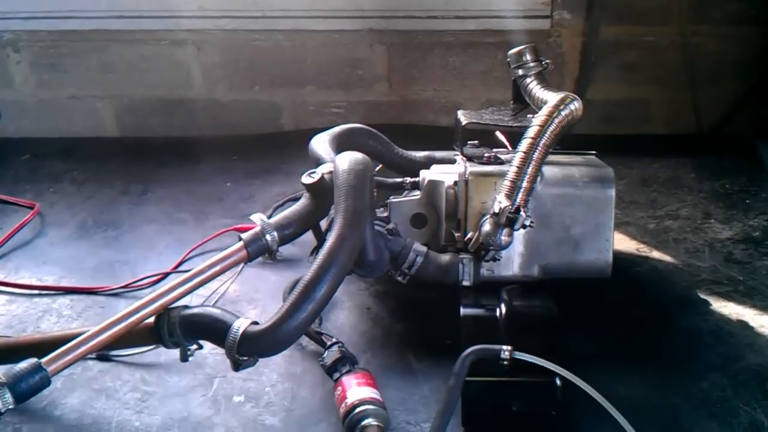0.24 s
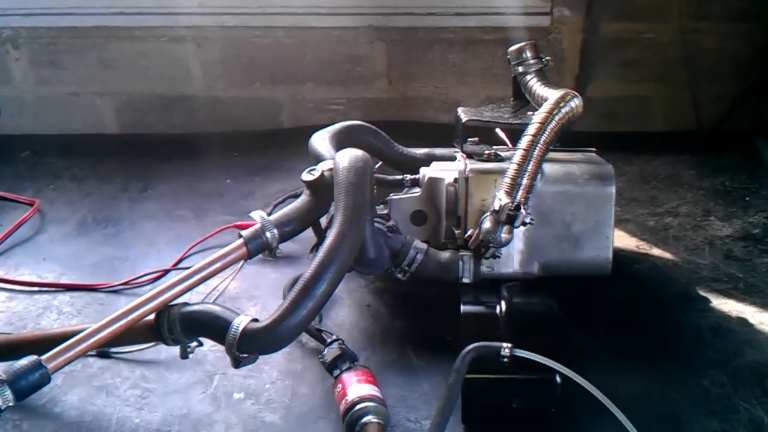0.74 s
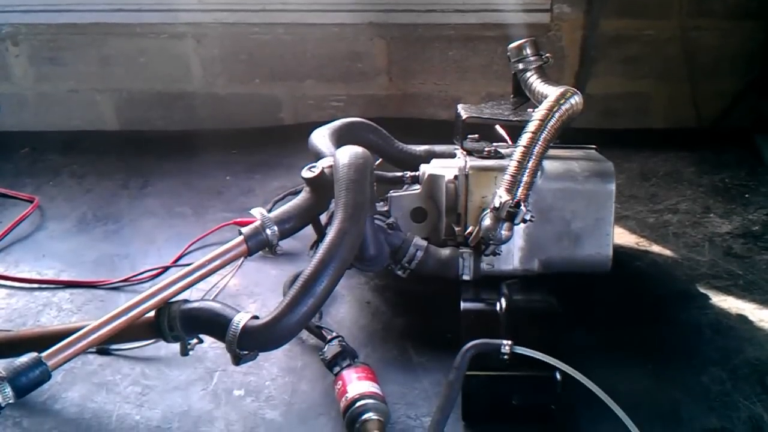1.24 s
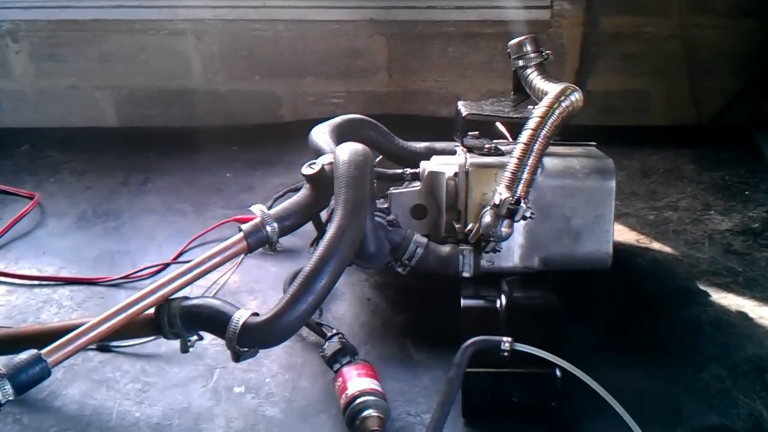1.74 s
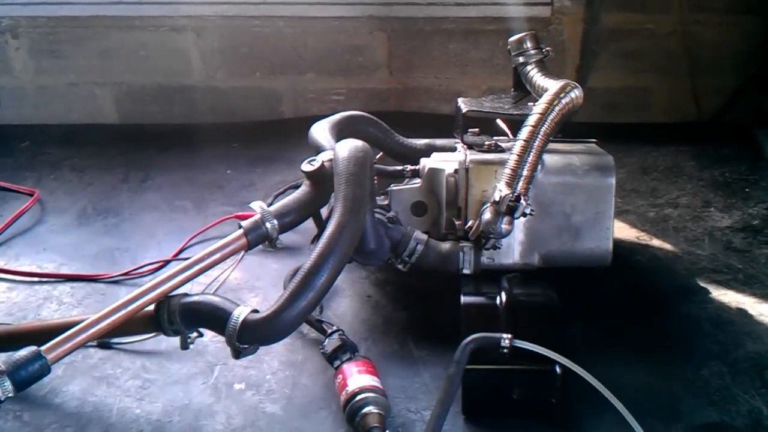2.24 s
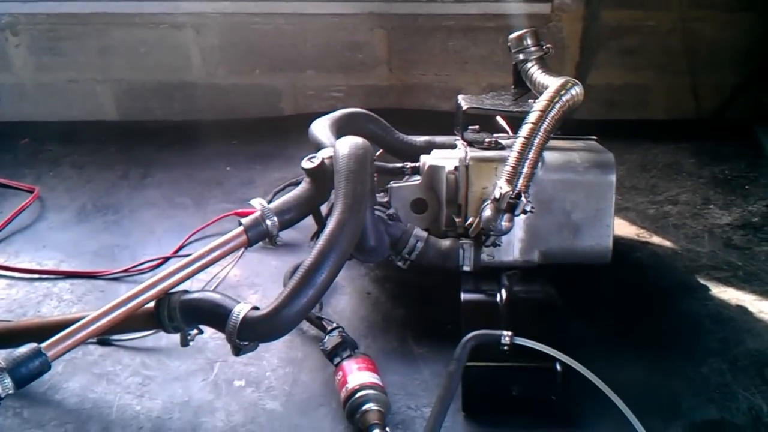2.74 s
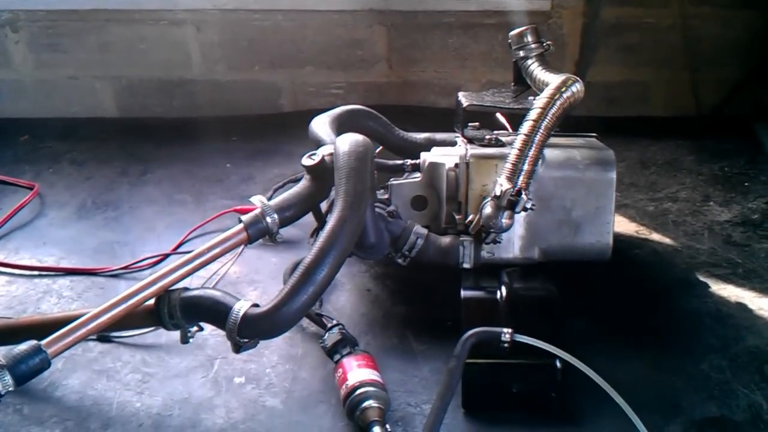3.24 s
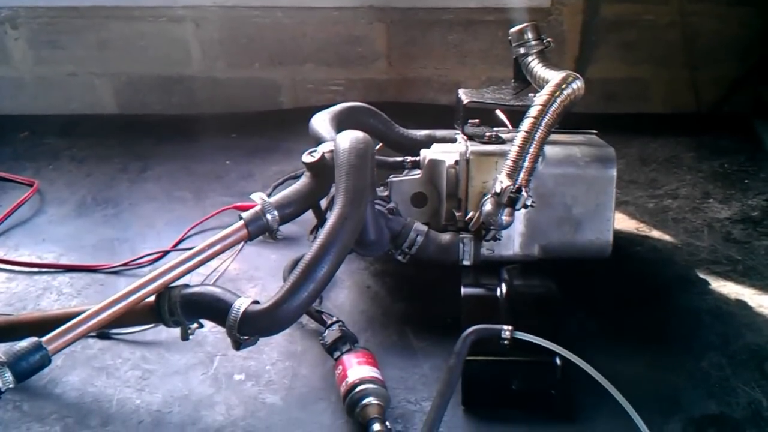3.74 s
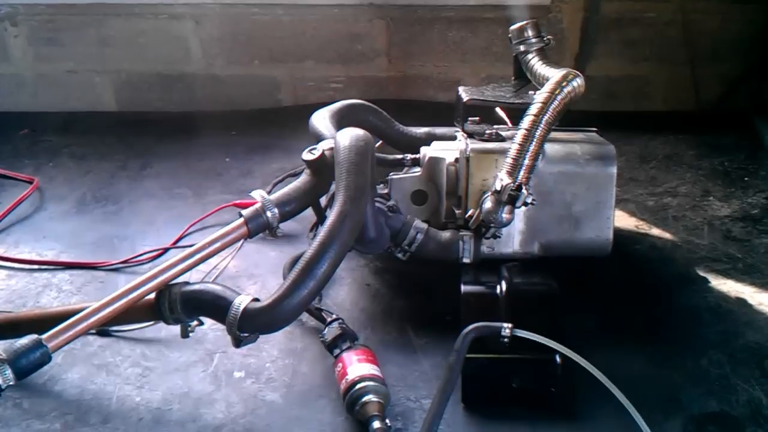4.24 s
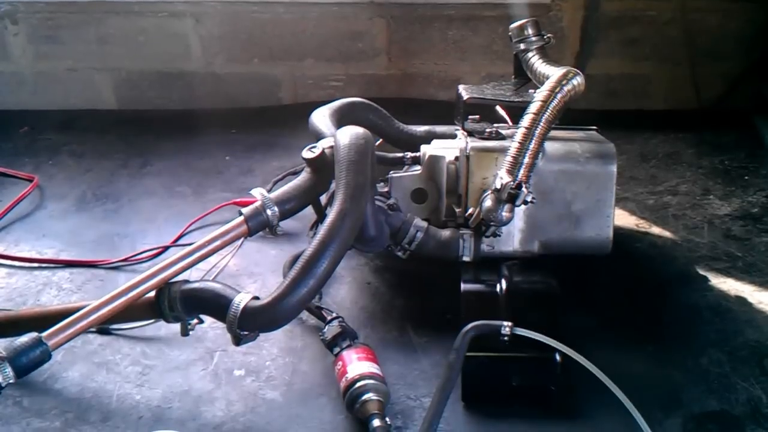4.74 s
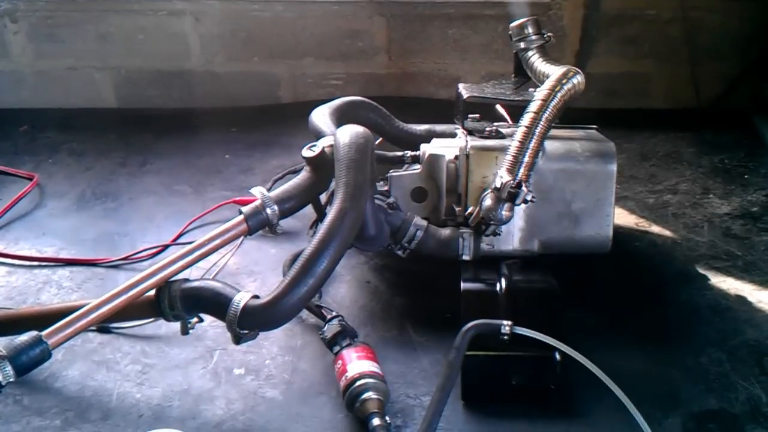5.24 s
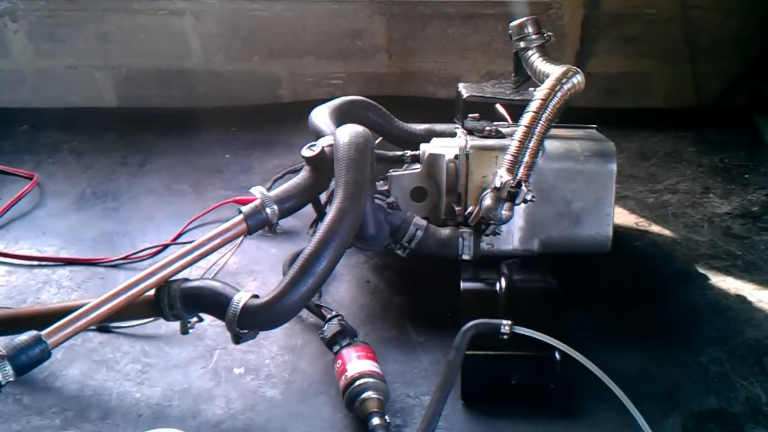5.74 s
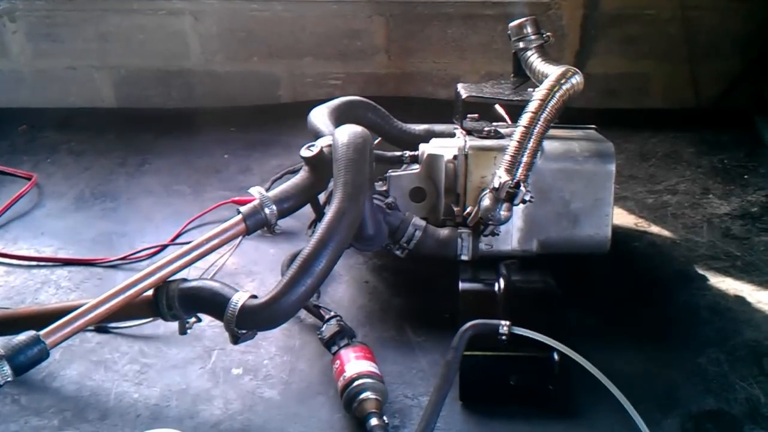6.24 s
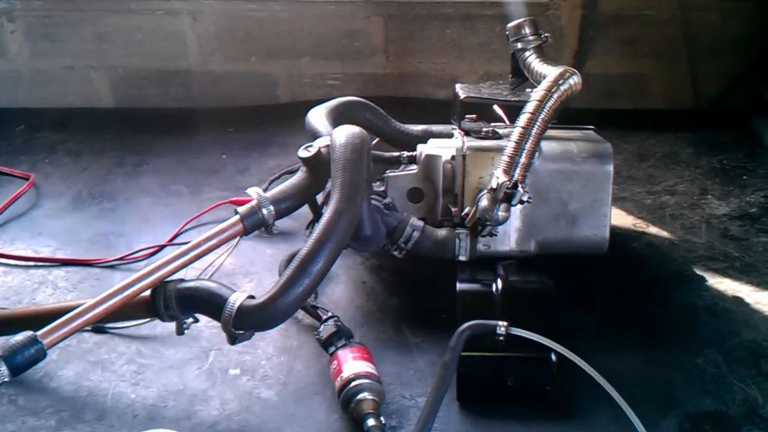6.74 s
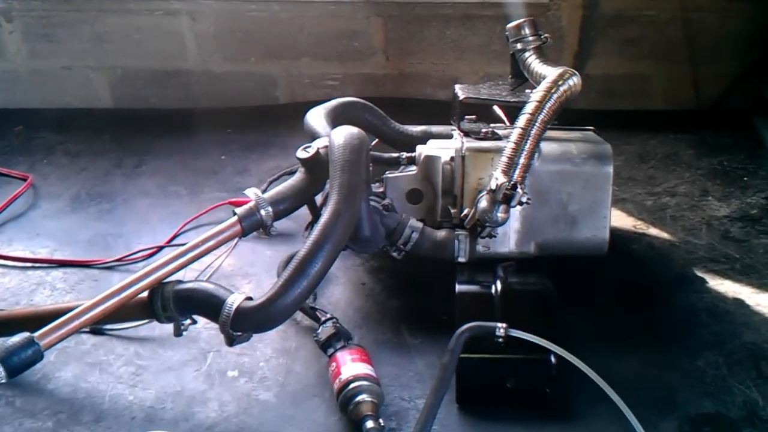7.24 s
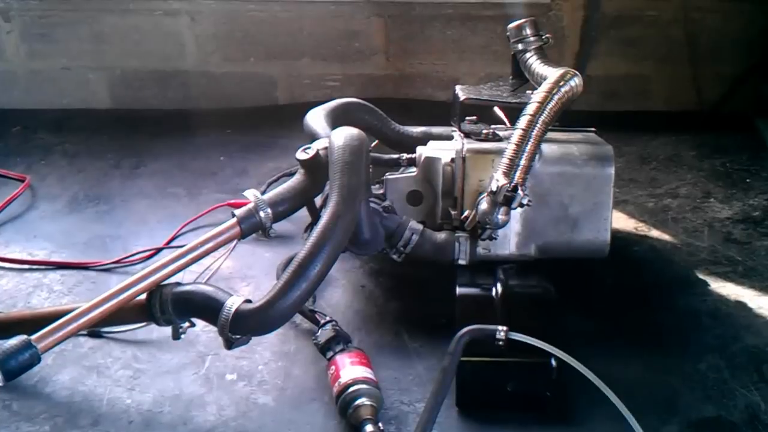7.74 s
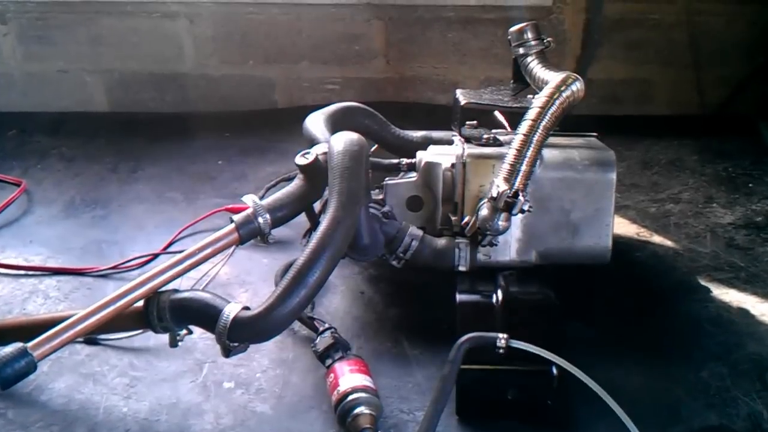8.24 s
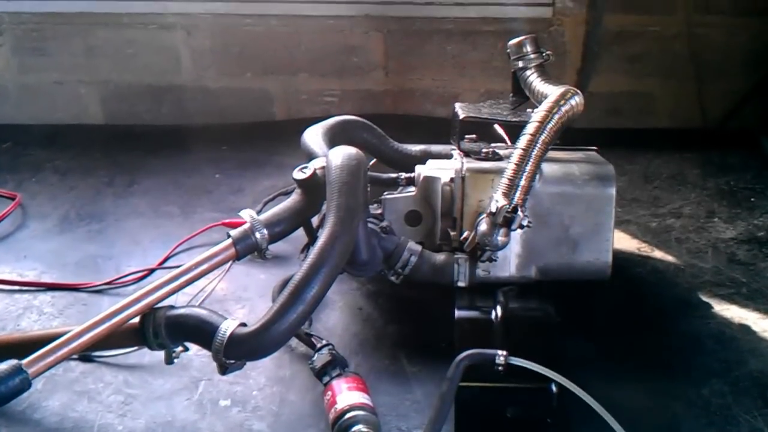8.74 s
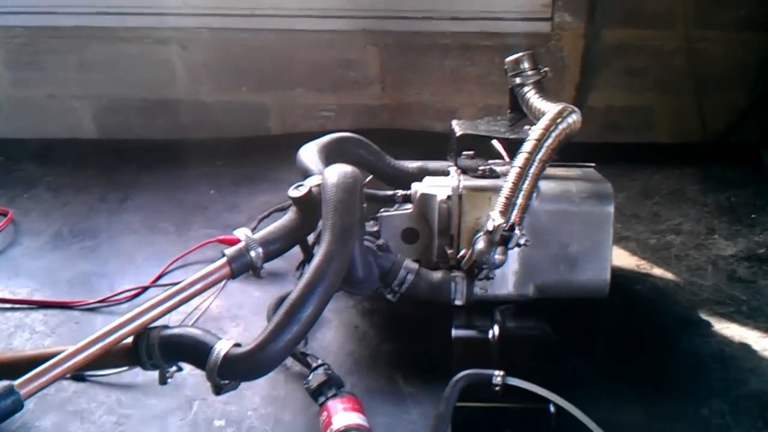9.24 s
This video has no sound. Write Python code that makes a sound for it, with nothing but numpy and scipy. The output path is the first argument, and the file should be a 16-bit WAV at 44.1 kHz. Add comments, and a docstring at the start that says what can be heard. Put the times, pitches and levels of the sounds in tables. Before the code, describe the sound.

Close steady electric fan whine with rushing air, crisp metallic ticks just over a second apart, and a faint fluttering burner rumble emerging later.

```python
"""Vehicle heater starting from cold

A fuel-burning heater runs up on a workshop floor, close by. Its fan speeds up in small eased steps:
blade tones glide through duct resonances, brushes ring the housing and shaped noise makes the airflow.
A chopped supply whines at a fixed pitch, the coolant pump hums and the glow plug supply clicks faintly.
Decaying modes make the dosing pump's ticks; low noise makes soft exhaust puffs and the growing flame.
A few stray ticks and a scuff are short bursts of filtered noise.
"""
import sys
import numpy as np
from scipy import signal
from scipy.fft import rfft, irfft
from scipy.io import wavfile
from scipy.ndimage import uniform_filter1d

SR = 44100
rng = np.random.default_rng(int(sys.argv[2]) if len(sys.argv) > 2 else 0)


def wav_record(signal):
    """Record a signal, one row per channel, as 16-bit PCM in the file named by sys.argv[1]."""
    frames = np.transpose(np.atleast_2d(signal))
    bounded = np.clip(frames, -1, 1)
    # unit amplitude maps onto the largest positive 16-bit level
    quanta = np.round(bounded * 32767).astype(np.int16)
    wavfile.write(sys.argv[1], SR, quanta)


N = 418950
TIME = np.arange(N) / SR
FREQ = np.fft.rfftfreq(N, 1 / SR)
START_HZ = 52.389  # the fan's first shaft speed

# motor housing resonances: (centre [Hz], width [Hz], gain [dB])
HOUSING_MODES = [(5680, 400, -8.5), (6930, 300, 0.5), (7310, 176, -2.5), (7490, 140, 0), (7567, 38, 1.5),
                 (7885, 150, 3.5), (8110, 190, -2), (8210, 260, -7), (8750, 63, -16), (8850, 240, -11.5),
                 (9900, 430, -15)]


def undb(db):
    """Turn decibels into an amplitude factor."""
    return 10 ** (np.asarray(db) / 20)


def unit(x):
    """Scale to rms 1."""
    return x / np.sqrt(np.mean(x ** 2))


def curves(table):
    """The columns of a table, joined by straight lines in time."""
    s, *columns = np.transpose(table)
    return [np.interp(TIME, s, column) for column in columns]


def slope(points, hz=FREQ):
    """Gain of a (Hz, dB) outline, interpolated over log frequency."""
    f, db = np.transpose(points)
    return undb(np.interp(np.log(hz + 1), np.log(f), db))


def resonances(table, hz=FREQ):
    """Summed gain of a set of (Hz, width, dB) peaks."""
    return sum(undb(db) / (1 + (2 * (hz - f) / width) ** 2) for f, width, db in table)


def shaped(x, gain):
    """Filter a signal by a gain for each frequency."""
    return irfft(rfft(x) * gain, N)


def noise(gain):
    """Noise whose density per root Hz is gain."""
    return shaped(rng.standard_normal(N), gain) * np.sqrt(SR / 2)


def walk(rate_hz, size=2048):
    """Smooth random drift with a spread of 1; a higher rate wanders faster."""
    hz = np.arange(size // 2 + 1) * SR / N
    slow = irfft(rfft(rng.standard_normal(size)) * np.exp(-(hz / rate_hz) ** 2))
    return np.interp(TIME, np.linspace(0, N / SR, size), unit(slow))


def room(x, wet_db, t60):
    """Add dense, decaying reflections from floor and walls, roughly keeping the power."""
    t = TIME[:SR // 2]
    tail = rng.standard_normal(len(t)) * undb(-60 * t / t60)
    tail = tail * (t > .003)  # a short gap before the first reflection
    wet = signal.fftconvolve(x, tail / np.linalg.norm(tail))[:N]
    return (x + undb(wet_db) * wet) / np.sqrt(1 + undb(2 * wet_db))


def each_turn(turns, orders, gains, snag=9, snag_turns=0.022, size=8192):
    """A waveform repeated on every turn: given rms per order, phases of a scrape that snags at the start."""
    snag_shape = 1 + snag * np.exp(-np.arange(size) / size / snag_turns)
    scrape = rng.standard_normal(size) * snag_shape
    k = np.round(orders).astype(int)
    spectrum = np.zeros(size // 2 + 1, complex)
    spectrum[k] = gains * np.exp(1j * np.angle(rfft(scrape)[k]))
    cycle = irfft(spectrum) * size / np.sqrt(2)
    closed_cycle = np.append(cycle, cycle[0])
    return np.interp(turns % 1 * size, np.arange(size + 1), closed_cycle)


def strikes(times, gains, ring):
    """The same short ring started at each time."""
    hits = np.zeros(N)
    starts = np.clip(np.round(np.asarray(times) * SR).astype(int), 0, N - 1)
    hits[starts] = gains
    return signal.fftconvolve(hits, ring)[:N]


def shaft_speed(spin_up_s=.462):
    """After each step of the controller the fan eases exponentially towards its new speed."""
    # controller steps: (time [s], added shaft speed [Hz])
    speed_steps = [(.061, .811), (1.213, .785), (2.483, .744), (4.125, .728), (5.581, 1.479), (6.867, .629),
                   (8.16, .815)]
    added_hz = sum(hz * (1 - np.exp(-np.maximum(TIME - s, 0) / spin_up_s)) for s, hz in speed_steps)
    return START_HZ + added_hz


def blower(turns, shaft_hz, waver_db=0.6, shaft_db=-2.0, brush_db=-2.0, bed_db=-4.0):
    """Blade and slot tones swell as they cross duct resonances; a dense brush comb rings the housing."""
    # shaft orders at which blades and slots sing: (order [per turn])
    blade_orders = (14, 19, 24, 32, 38)
    # air duct resonances: (centre [Hz], width [Hz], level of a tone at the centre [dB])
    duct_modes = [(747, 57, -72.5), (809.5, 29, -62.5), (1002, 48, -62.5), (1031.7, 15, -52.5),
                  (1058, 14, -54.5), (1074, 65, -49.7), (1294, 21, -64.5), (1329, 29, -58.6),
                  (1382, 26, -58), (1402, 8, -60), (1826, 84, -56), (2066, 41, -47.5), (2127, 75, -46),
                  (2204, 39, -52)]
    # weaker shaft tones: (order [per turn], level before the shaft trim [dB])
    shaft_tones = [(16, -67.5), (25, -68), (31, -63.5), (33, -64), (40, -67), (43, -63), (44, -62),
                   (46, -66.5), (48, -65), (52, -66), (63, -68), (66, -69), (71, -71)]
    # strongest brush buzz: (order [per turn], level before trim and housing [dB])
    brush_tones = [(117, -52), (118, -52), (119, -53), (123, -58), (125, -58), (127, -57), (129, -53),
                   (130, -57), (132, -59), (135, -58), (137, -56), (139, -55), (140, -57), (145, -62),
                   (147, -56), (149, -59), (150, -54), (151, -56), (152, -59), (153, -58)]
    # outline of all other orders: (frequency [Hz], level per order before the bed trim [dB])
    bed_outline = [(700, -81), (1700, -69.5), (2600, -70), (3300, -74.5), (4800, -79.5), (5800, -73),
                   (6600, -65), (7500, -65.5), (8700, -65), (9700, -71.5), (10800, -81)]

    blades = 0
    for k in blade_orders:
        gain = resonances(duct_modes, k * shaft_hz) * undb(waver_db * walk(3.2))
        blades = blades + np.sqrt(2) * gain * np.sin(2 * np.pi * k * turns)

    low, low_db = np.transpose(shaft_tones)
    high, high_db = np.transpose(brush_tones)
    rest = np.setdiff1d(np.arange(13, 200), np.round(np.r_[blade_orders, low, high]))
    shaft = each_turn(turns, low, undb(low_db + shaft_db))
    brush = shaped(each_turn(turns, high, undb(high_db + brush_db)), resonances(HOUSING_MODES))
    bed = each_turn(turns, rest, slope(bed_outline, rest * shaft_hz.mean()) * undb(bed_db))
    # as the bed's tones glide, their reflections make them swell and fade
    return blades + shaft + brush + room(bed, wet_db=1.0, t60=0.21)


def brush_ticks(turns, tick_db=-42, scatter_db=3, ring_s=0.0011):
    """Once a turn a brush snaps over a commutator bar with varying force and rings the housing."""
    s = TIME[1:][np.diff(np.floor(turns)) > 0]
    t = TIME[:SR // 50]
    ring = unit(noise(resonances(HOUSING_MODES)))[:len(t)] * np.exp(-t / ring_s)
    return strikes(s, undb(tick_db + scatter_db * rng.standard_normal(len(s))), ring)


def whine(turns, shaft_hz, chopper_hz=1964.5, waver_db=1.5, waver_hz=1.5):
    """The motor's chopped supply sings at a fixed pitch; eight commutator bars add gliding sidebands."""
    # main tones: (time [s], fundamental level [dB], octave level [dB])
    whine_levels = [(0, -37, -70.5), (2.8, -37, -64), (3.4, -38, -60.5), (4.6, -37, -67), (6.1, -37, -63),
                    (6.8, -36, -65), (8.5, -36.5, -71), (9.45, -33, -60)]
    # wavering overtones and sidebands: (chopper harmonic [number], shaft orders added [per turn],
    # level at the first speed [dB], level change per added shaft speed [dB/Hz])
    partials = [(1, -8, -68.5, 0.65), (1, 8, -71, 0.5), (1, 16, -66.5, 0), (2, 8, -70.5, -0.1),
                (3, -8, -60, -1), (3, 0, -58, -2), (3, 8, -68, 0.7), (4, -8, -63, 0), (4, 0, -63, -0.5),
                (4, 8, -73, -.5), (5, 0, -65.5, -1)]
    level_db, octave_db = curves(whine_levels)
    phase = 2 * np.pi * chopper_hz * TIME
    tone = undb(level_db) * np.sin(phase) + undb(octave_db) * np.sin(2 * phase)
    for k, order, db, db_per_hz in partials:
        gain = undb(db + db_per_hz * (shaft_hz - START_HZ) + waver_db * walk(waver_hz))
        tone = tone + gain * np.sin(round(k) * phase + 2 * np.pi * round(order) * turns)
    return np.sqrt(2) * tone  # sine levels are rms


def airflow(housing_db=-81, gust_db=0.35, hiss_flicker_db=0.66):
    """Turbulence, as shaped noise, hisses, hums in the pipes and stirs the housing."""
    # rushing air: (frequency [Hz], density [dB per Hz])
    air_outline = [(20, -94), (45, -91.5), (110, -93), (300, -84.5), (600, -88.5), (950, -82), (1500, -89),
                   (2300, -91), (3200, -93.5), (4600, -93.5), (6000, -93.5), (9600, -93), (11200, -103),
                   (16000, -104)]
    # intake and exhaust pipe resonances: (centre [Hz], width [Hz], density [dB per Hz])
    pipe_modes = [(80.5, 34, -82), (147, 18, -85.5), (297, 38, -81), (394, 57, -88), (440, 44, -82.5),
                  (852, 34, -93), (1802, 130, -79.5), (1948, 110, -82), (2077, 79, -81)]
    rush = noise(slope(air_outline)) * undb(hiss_flicker_db * walk(19))
    pipes = noise(resonances(pipe_modes)) * undb(gust_db * walk(2))
    housing = noise(resonances(HOUSING_MODES) * undb(housing_db))
    return rush + pipes + housing


def hum(hum_hz=199.4, hum_db=-66.0, octave_db=-54.5, waver_db=0.47, drift=0.00111):
    """The coolant pump hums at a nearly constant speed, its octave stronger than its fundamental."""
    phase = 2 * np.pi * hum_hz * np.cumsum(1 + drift * walk(2.66)) / SR
    tone = undb(hum_db) * np.sin(phase) + undb(octave_db) * np.sin(2 * phase)
    return np.sqrt(2) * tone * undb(waver_db * walk(4.6))


def glow_clicks(start_s=.0215, period_s=.09941, click_db=-46.5, scatter_db=2, decay_s=0.0024,
                centre_hz=5100, width_hz=2400):
    """Faint evenly spaced clicks, ten a second, as the glow plug current is switched."""
    s = np.arange(start_s, N / SR, period_s)
    t = TIME[:SR // 20]
    ring = unit(noise(resonances([(centre_hz, width_hz, 0)])))[:len(t)] * np.exp(-t / decay_s)
    return strikes(s, undb(click_db + scatter_db * rng.standard_normal(len(s))), ring)


def puffs(length_s=0.062, centre_hz=143, width_hz=25):
    """Soft low puffs in the exhaust pipe: narrow noise under smooth swells."""
    # puffs: (time [s], level [dB])
    puff_times = [(0.19, -62), (1.33, -58), (4.5, -58), (6.12, -58), (8.93, -56)]
    swell = sum(undb(db) * np.exp(-((TIME - s) / length_s) ** 2) for s, db in puff_times)
    return swell * unit(noise(resonances([(centre_hz, width_hz, 0)])))


def dosing_pump(ring_db=1, crack_db=-6.0, crack_t60=0.014, attack_s=0.00026,
                knock_db=-8, knock_t60=0.0017, knock_hz=1500,
                lift_db=-25, lift_s=0.006, return_db=-18, return_s=.0652):
    """The plunger lifts, slams on its stop, and springs back softly when the coil lets go."""
    # plunger strokes: (time [s], level [dB])
    strokes = [(1.0992, -17.5), (2.323, -18.5), (3.546, -18.5), (4.7681, -17), (5.9913, -18), (7.2147, -19),
               (8.4373, -18.5)]
    # pump body modes: (frequency [Hz], level before the ring trim [dB], t60 [s])
    body_modes = [(2180, -17.5, 0.0077), (2890, -15, 0.0079), (3630, -19.5, 0.0077), (4300, -23.5, 0.0085),
                  (4770, -11.5, 0.025), (5190, -13.5, 0.017), (5590, -6.5, 0.029), (5770, -12, 0.018),
                  (6160, -5.5, 0.016), (7170, -13.5, .025), (7320, -15.5, 0.026), (7920, -15, 0.021),
                  (9370, -14.5, 0.028), (9740, -9.5, 0.026), (10600, -23, 0.016), (12100, -27, 0.021),
                  (12250, -29, .022)]
    # spectrum of the plunger's crack: (frequency [Hz], relative level [dB])
    crack_outline = [(300, -22), (1200, -4), (3200, -7), (4400, -5), (5600, 0), (7000, -2), (9800, 0),
                     (11000, -8), (13000, -15), (16000, -21)]
    t = TIME[:SR // 5]

    def fade(t60):
        """Exponential decay by 60 dB in t60 seconds."""
        return np.exp(-np.log(1000) * t / t60)

    body = 0
    for k, (hz, db, t60) in enumerate(body_modes):
        body = body + (-1) ** k * undb(db) * fade(t60) * np.sin(2 * np.pi * hz * t)
    crack = undb(crack_db) * unit(noise(slope(crack_outline)))[:len(t)] * fade(crack_t60)
    # the whole pump recoils on the floor
    knock = undb(knock_db) * np.sin(2 * np.pi * knock_hz * t) * fade(knock_t60)
    attack = 1 - np.exp(-(t / attack_s) ** 2)
    ring = (undb(ring_db) * body + crack) * attack + knock

    s, db = np.transpose(strokes)
    light_ring = np.diff(ring, prepend=0)  # light contacts sound thinner
    light_times = np.r_[s - lift_s, s + return_s]
    light = strikes(light_times, undb(np.r_[db + lift_db, db + return_db]), light_ring)
    return room(strikes(s, undb(db), ring) + light, wet_db=-7.5, t60=0.088)


def scuffs(width_hz=2000):
    """A few stray soft ticks and a scuff, each a short swell of band noise."""
    # ticks and scuff: (time [s], level [dB], centre [Hz], length [s])
    scuff_times = [(4.251, -51, 5200, .003), (6.798, -54, 3300, 0.029), (7.94, -51, 5300, .003),
                   (8.477, -48, 5400, .003)]
    total = 0
    for s, db, hz, length_s in scuff_times:
        swell = undb(db) * np.exp(-((TIME - s) / length_s) ** 2)
        total = total + swell * unit(noise(resonances([(hz, width_hz, 0)])))
    return total


def flame(ignition_s=4.6, settled_s=8.4, first_db=-76, full_db=-61, flare_s=0.027, flare_db=1.0):
    """The young flame's rumble grows in the exhaust's lowest resonance until settled, with short flares."""
    # flare-ups: (time [s], level before the flare trim [dB])
    flare_times = [(5.39, -56), (5.47, -52), (6.12, -53), (6.3, -55), (6.93, -53), (7.25, -51), (7.59, -52),
                   (7.85, -54), (7.93, -50), (8.0, -52), (8.22, -52), (8.32, -52), (8.51, -54), (8.84, -54),
                   (9.3, -55), (9.46, -55)]
    # colour of the roar: (frequency [Hz], relative level [dB])
    roar_outline = [(20, -28), (45, -8), (62, -2), (80, 8), (95, -7), (115, -16), (140, -10), (190, -15),
                    (255, -23), (295, -7), (340, -29), (500, -41)]
    rumble = undb(np.interp(TIME, [ignition_s, settled_s], [first_db, full_db])) * (TIME > ignition_s)
    flares = sum(undb(db + flare_db) * np.exp(-((TIME - s) / flare_s) ** 2) for s, db in flare_times)
    roar = noise(slope(roar_outline))
    roar = roar / np.sqrt(uniform_filter1d(roar ** 2, size=3000))  # even out the noise's own swells
    return roar * np.hypot(rumble, flares)


def scene(flutter=0.000235):
    """The blower shaft speeds up in small steps and drives the buzz, ticks and whine sidebands."""
    shaft_hz = shaft_speed()
    turns = np.cumsum(shaft_hz * (1 + flutter * walk(11.3))) / SR
    fan = blower(turns, shaft_hz) + brush_ticks(turns) + whine(turns, shaft_hz) + airflow()
    return (fan + hum() + glow_clicks() + puffs() + dosing_pump() + scuffs() + flame())[None]


def record(dry, top_hz=15900):
    """A steep elliptic low-pass cuts the top."""
    low_pass = signal.ellip(10, .1, 70, top_hz, fs=SR, output="sos")  # 0.1 dB ripple, 70 dB stop band
    return signal.sosfilt(low_pass, dry)


dry = scene()
out = record(dry)
wav_record(out)
```